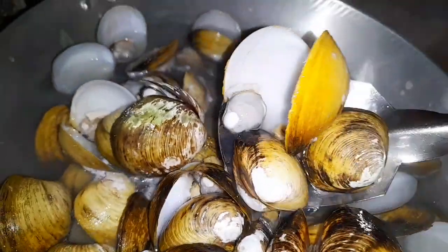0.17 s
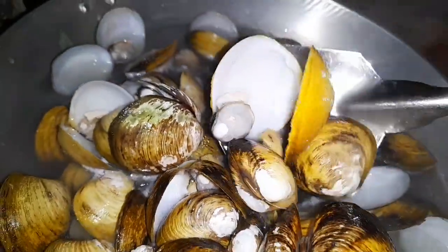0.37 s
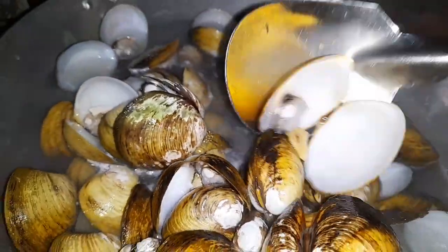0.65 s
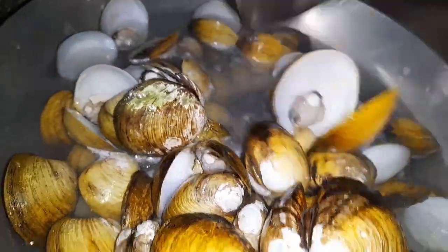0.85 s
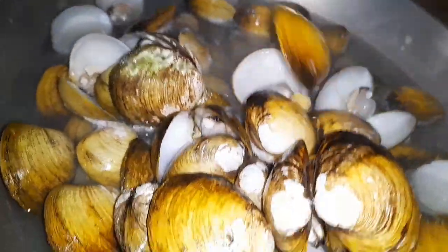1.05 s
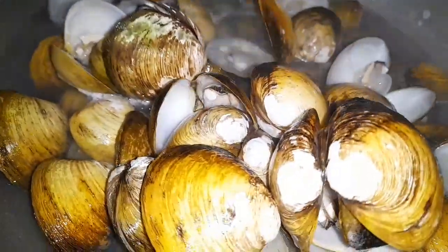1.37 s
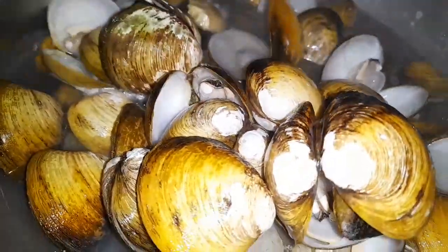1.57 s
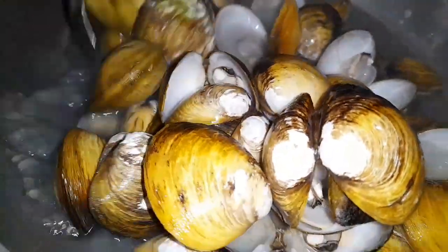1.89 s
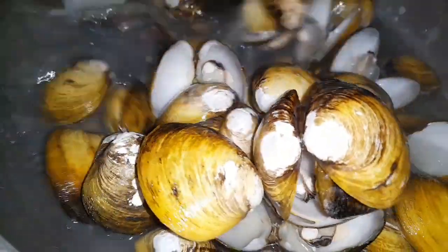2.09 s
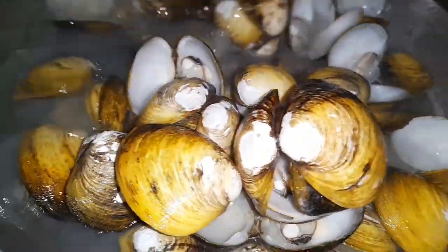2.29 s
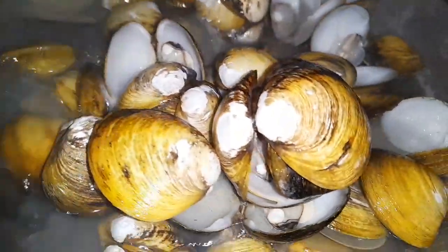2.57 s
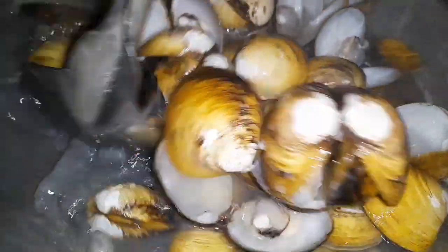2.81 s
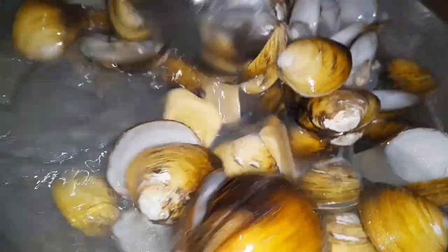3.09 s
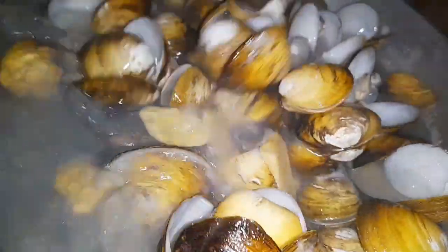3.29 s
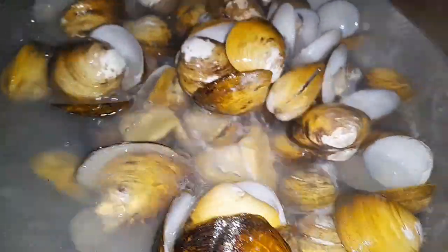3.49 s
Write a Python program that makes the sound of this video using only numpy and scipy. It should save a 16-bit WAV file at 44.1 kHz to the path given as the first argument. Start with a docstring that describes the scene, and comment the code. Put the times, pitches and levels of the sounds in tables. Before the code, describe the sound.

Clam shells click and clatter close to the microphone as a steel ladle stirs them in a pan of water. Scattered clicks grow into busy grinding and light sloshing, with one dull pan bump over a faint kitchen rumble.

```python
"""In a kitchen, clam shells are stirred with a steel ladle in a shallow pan of water.
A low rumble and a faint hiss fill the room. The shells grind over each other and the pan, water
slops between them, and each knock makes a click that rings briefly. Once the pan is bumped and
booms; later a few big bubbles gurgle. A phone with two microphones listens from close by."""
import sys
import numpy as np
from scipy import signal
from scipy.fft import rfft, irfft, next_fast_len
from scipy.io import wavfile
from scipy.ndimage import map_coordinates

SR = 44100
rng = np.random.default_rng(int(sys.argv[2]) if len(sys.argv) > 2 else 0)


def wav_out(sig):
    """Save sig, one row per channel (or a flat mono array), as 16-bit PCM at SR to the path in sys.argv[1]."""
    wavfile.write(sys.argv[1], SR, np.round(np.clip(np.atleast_2d(sig).T, -1, 1) * 32767).astype(np.int16))


N = 160965


def amp(db):
    return 10 ** (np.asarray(db) / 20)

def unit(x):
    return x / np.sqrt(np.mean(x ** 2) + 1e-20)

def along(points, hz):
    """Read between (frequency, value) points on a log frequency axis."""
    f, values = np.transpose(points)
    return np.interp(np.log(hz + 1), np.log(f + 1), values)

def curves(rows):
    """One value per sample for each column after the time."""
    times, *columns = np.transpose(rows)
    return [np.interp(np.arange(N) / SR, times, column) for column in columns]

def wobble(rate):
    """A smooth curve through `rate` random values a second."""
    return map_coordinates(rng.standard_normal(int(N * rate / SR) + 4), [np.arange(N) * rate / SR])

def filtered(x, response):
    """Scale and delay each frequency in x as response(hz) says."""
    size = next_fast_len(x.shape[-1] + 4096)
    return irfft(rfft(x, size) * response(np.fft.rfftfreq(size, 1 / SR)), size)[..., :x.shape[-1]]

def band(points):
    """A filter that follows (f/Hz, level/dB) points and falls away outside them."""
    ends = [(points[0][0] / 2, -120)] + list(points) + [(points[-1][0] * 2, -120)]
    return lambda hz: amp(along(ends, hz))

def stereo_noise(response, alike):
    """Filtered noise; `alike` (0 to 1) says how similar left and right are."""
    a, b = filtered(rng.standard_normal((2, N)), response)
    angle = np.arccos(alike) / 2
    middle, side = np.cos(angle) * a, np.sin(angle) * b
    return unit(np.array([middle + side, middle - side]))

def place(times, sounds):
    """Add up short sounds, shaped (events, 2, samples), at their start times."""
    at = np.round(times * SR).astype(int)[:, None] + np.arange(sounds.shape[-1])
    return np.array([np.bincount(at.ravel(), sounds[:, c].ravel(), N + SR)[:N] for c in range(2)])

def microphones(left_db):
    """Gain and delay at each microphone for sounds that are left_db louder on the left."""
    side = np.array([.5, -.5])
    lead_s = -.00004 + .000036 * left_db
    return amp(np.outer(left_db, side)), -np.outer(lead_s, side)


# How loud the room's rumble is: t/s, level/dB
RUMBLE_LEVELS = [(0, -45), (.9, -42), (1.1, -46), (1.5, -43), (2.45, -45), (2.8, -43), (3.65, -42)]
# The rumble's tone, from low to high: f/Hz, relative level/dB
RUMBLE_TONE = [(25, -36), (42, -16), (55, -7), (90, -11), (200, -7), (260, -12), (340, -17), (450, -26),
               (900, -34)]
# Humps added to that tone: f/Hz, width/Hz, relative level/dB
RUMBLE_HUMPS = [(61, 16, 11), (117, 24, 6)]
# The tone of the hiss: f/Hz, relative level/dB
HISS_TONE = [(500, -2), (900, -3), (1800, -9), (4500, -9), (8000, -13), (10200, -8), (14300, -13),
             (16500, -39)]

def rumble_and_hiss(hiss_db=-59):
    """The room's background: an uneven low rumble and a steady hiss."""
    def tone(f):
        humps = sum(amp(db) / (1 + ((f - hz) / (width / 2)) ** 2) for hz, width, db in RUMBLE_HUMPS)
        return band(RUMBLE_TONE)(f) * (1 + humps)

    level_db, = curves(RUMBLE_LEVELS)
    rumble = stereo_noise(tone, alike=.3) * amp([[.8], [-.8]])
    rumble *= amp(level_db + 1.5 * wobble(30))
    return rumble + amp(hiss_db) * stereo_noise(band(HISS_TONE), alike=.3)


STIR_LEFT_DB = 3  # the stirring is this much louder on the left

def pings(per_s, hz, pitch_spread, fade_s, spread_db, rise, size=900):
    """A random rain of tiny tones; each drops 60 dB in fade_s(f) and glides up by `rise`."""
    when, pitch, strength, where = rng.random((int(per_s * N / SR), 4)).T
    f = (hz * np.exp(pitch_spread * (2 * pitch - 1)))[:, None, None]
    gain, delay = microphones(STIR_LEFT_DB + 6 * (where - .5))
    t = np.clip(np.arange(size) / SR - .0002 - delay[..., None], 0, None)
    age = t / fade_s(f)
    wave = amp(-60 * age) * np.sin(2 * np.pi * f * t * (1 + rise * age))
    level = amp(-spread_db * np.log(strength + .01))[:, None, None]
    return unit(place(when * N / SR, wave * gain[..., None] * level))


# The tone of the grinding's body: f/Hz, relative level/dB
GRIND_TONE = [(1200, -12), (2900, 0), (4500, -2), (6500, -7), (8000, -20)]
# The tone of its high rasp: f/Hz, relative level/dB
RASP_TONE = [(5500, -18), (7500, -6), (10100, 0), (12000, -5), (15200, -14), (16500, -30)]
# The notes the steel ladle rings at, scraped here and struck in clicks(): f/Hz
LADLE_NOTES = [2860, 4360, 4900, 7220, 8030, 9300, 10350, 11220]

def grinding(body_db, treble_db, note_width_hz=90):
    """Shells tick and rub against each other, and the scraping makes the ladle ring."""
    def ladle(f):
        damping = 1j * f * note_width_hz
        return sum(damping / (hz * hz - f * f + damping) for hz in LADLE_NOTES)

    ticks = pings(per_s=700, hz=4500, pitch_spread=1.2, fade_s=lambda f: .003, spread_db=3.5, rise=0)
    rub = stereo_noise(np.ones_like, alike=.5) * amp(3.5 * wobble(80))
    rub *= amp([[STIR_LEFT_DB / 2], [-STIR_LEFT_DB / 2]])
    grit = amp(-2) * ticks + amp(-3) * rub
    body = amp(body_db) * unit(filtered(grit, band(GRIND_TONE)))
    rasp = amp(treble_db) * unit(filtered(grit, band(RASP_TONE)))
    scrape = amp(treble_db - 7) * unit(filtered(grit, ladle))
    return body + rasp + scrape


# The tone of the washing water: f/Hz, relative level/dB
WASH_TONE = [(150, -9), (290, 1.5), (480, -5), (800, -.8), (1300, -6), (2200, -14)]

def slopping():
    """Water washes between the shells, full of small bubbles that each ring for a moment."""
    bubbles = pings(per_s=220, hz=650, pitch_spread=.8, fade_s=lambda f: np.minimum(14 / f, .02),
                    spread_db=4, rise=.25)
    wash = stereo_noise(band(WASH_TONE), alike=.3) * amp(2.5 * wobble(30))
    return amp(-5) * bubbles + amp(.3) * wash


# How loud the stirring is: t/s, grinding body level/dB, grinding treble level/dB, water level/dB
STIR_LEVELS = [(.28, -72, -70, -66), (.38, -63, -58, -60), (.48, -64, -60, -60), (.54, -50, -62, -47),
               (.6, -64, -66, -60), (.85, -53, -60, -56), (1.08, -68, -64, -66), (1.28, -62, -62, -58),
               (1.3, -36, -34, -48), (1.39, -48, -45, -50), (1.45, -32, -25, -47), (1.51, -43, -41, -54),
               (1.57, -35, -35, -45), (1.7, -49, -55, -46), (2.0, -57, -64, -54), (2.1, -41, -42, -42),
               (2.22, -45, -54, -44), (2.29, -38, -37, -48), (2.42, -62, -64, -60), (2.53, -66, -68, -64),
               (2.6, -36, -37, -47), (2.72, -54, -60, -45), (2.8, -40, -47, -37), (2.88, -53, -58, -50),
               (3.0, -39, -46, -39), (3.13, -33, -37, -37), (3.22, -48, -54, -48), (3.3, -39, -46, -40),
               (3.4, -38, -45, -41), (3.49, -56, -58, -56), (3.65, -63, -62, -60)]

def stirring():
    """Grinding and slopping swell and fade as the ladle moves."""
    body_db, treble_db, water_db = curves(STIR_LEVELS)
    return grinding(body_db, treble_db) + amp(water_db) * slopping()


def click_tone(bass_db, treble_db):
    """The filter that makes one click dull or bright."""
    low, high = bass_db + 6, treble_db + 1.5
    points = [(250, low - 24), (800, low - 3), (1600, low), (3000, -.3), (5500, -1.5),
              (7800, high - 5), (10000, high), (16000, high - 11)]
    return lambda hz: amp(along(points, hz))

def crack(t, tone, ring_hz, delay, length):
    """A knock's burst of noise and its rattling tail; a shorter burst also hits harder."""
    def response(f):
        hump_db = 6 * np.exp(-.5 * (np.log((f + 1) / ring_hz) / .09) ** 2)
        return tone(f) * amp(hump_db) * np.exp(-2j * np.pi * f * delay[:, None])

    shared, *each_side = rng.standard_normal((3, t.shape[-1]))
    noise = filtered(shared + .8 * np.array(each_side), response)
    burst = amp(-60 * t / (.009 * length)) / length ** 2
    tail = amp(-13 - 60 * t / .08)
    return noise * (burst + tail)


# The notes of a large empty shell that lands first: f/Hz
BIG_SHELL_NOTES = [2536, 3305, 4000, 4398, 6272, 9701]
# One knock a row, with levels relative: t/s, body level/dB, main ring f/Hz,
# bass over body level/dB, treble over body level/dB, left over right level/dB
KNOCKS = [(0.497, -46, 780, 8, -8, -1), (0.5204, -43, 3080, -2, -10, 1), (0.599, -44, 2000, -2, -14, 1),
          (0.6392, -26, 7950, -21, -3, 0), (0.6626, -35, 820, -1, -7, -2), (0.6761, -20, 5210, -16, -9, -1),
          (0.7362, -34, 2990, -14, -10, -4), (0.7497, -23, 2970, -22, -5, -4),
          (0.7646, -15, 1590, 0, -17, -1), (0.833, -14, 2970, -15, -10, 0), (0.8568, -34, 1530, 1, -11, 0),
          (0.928, -46, 1610, 8, -10, 2), (0.959, -48, 1100, 6, -10, 2), (1.0124, -40, 2520, -4, -12, 4),
          (1.1168, -12, 9730, -16, -3, 1), (1.154, -36, 2410, -5, -2, 0), (1.1989, -32, 5300, -11, 5, 1),
          (1.2917, -24, 11160, -14, 1, 3), (1.3233, -23, 4910, 2, 3, 5), (1.3898, -34, 3530, -8, 0, 5),
          (1.4039, -19, 9300, -19, 4, 5), (1.4095, -19, 10290, -19, 3, 5), (1.4455, -24, 10490, -17, 8, 6),
          (1.4575, -20, 9860, -14, 5, 6), (1.4677, -20, 10380, -14, 5, 5), (1.4795, -23, 10100, -14, 6, 5),
          (1.5342, -29, 2970, -12, -5, 6), (1.5679, -23, 9630, -16, 5, 8), (1.5761, -22, 3140, -14, 1, 5),
          (1.5898, -27, 10310, -14, 6, 7), (1.6098, -18, 9860, -11, 3, 7), (1.6267, -26, 4950, -5, -5, 5),
          (1.6693, -29, 4480, -6, -5, 7), (1.6878, -34, 1590, -1, -12, 6), (1.7612, -35, 3640, -7, -14, 8),
          (1.8205, -22, 12470, -16, 3, 7), (1.9321, -21, 3490, -15, -14, 8), (2.0216, -39, 860, -1, -9, 1),
          (2.0617, -23, 6480, -7, -9, 2), (2.0787, -21, 9600, -6, 5, 2), (2.1275, -23, 5400, -10, -6, 4),
          (2.1384, -32, 900, 1, -6, 4), (2.1857, -34, 1210, 2, -14, 3), (2.2048, -28, 1210, -3, -13, 2),
          (2.2418, -16, 4300, -23, -2, 1), (2.2699, -16, 5230, -18, 1, 1), (2.2764, -17, 5300, -18, 2, 3),
          (2.281, -19, 4780, -17, 1, 1), (2.2926, -24, 5190, -15, -3, 4), (2.3326, -24, 4000, -2, -8, 5),
          (2.3606, -20, 5340, -20, -4, 6), (2.431, -44, 1500, 0, -8, 4), (2.469, -42, 3800, -6, -8, 4),
          (2.5405, -21, 11260, -18, 6, 5), (2.5888, -22, 10010, -13, 4, 7), (2.6049, -26, 11780, -16, 2, 6),
          (2.6414, -20, 5250, -15, -6, 7), (2.6651, -29, 5400, -7, -8, 7), (2.7415, -31, 3250, -7, -19, 3),
          (2.7779, -23, 3230, -5, -8, 6), (2.7828, -24, 2130, -7, -9, 7), (2.9405, -31, 2890, -6, -6, 1),
          (2.9622, -22, 2370, -10, -12, 5), (2.9831, -24, 3320, -12, -7, 4), (3.0112, -22, 5000, -4, -9, 4),
          (3.0356, -27, 3600, -7, -14, 8), (3.0567, -23, 3750, -12, -5, 2), (3.0686, -27, 4690, -9, -3, 2),
          (3.0924, -26, 5400, -9, -7, 3), (3.1074, -24, 2370, -5, -9, 2), (3.1142, -18, 3810, -10, -16, 8),
          (3.1369, -19, 5490, -5, -3, 5), (3.1418, -21, 3920, -8, -1, 3), (3.2259, -28, 2020, -9, -7, 1),
          (3.2843, -18, 2090, -10, -12, 2), (3.2968, -25, 10870, -12, -1, 3),
          (3.314, -29, 3600, -2, -12, 3), (3.3292, -25, 4970, -5, -14, 5), (3.3373, -27, 3080, -14, -5, 2),
          (3.3446, -17, 5150, -11, -5, 4), (3.3676, -12, 3400, -17, -12, 2), (3.409, -28, 3960, -14, -6, 6),
          (3.414, -15, 3490, -13, -5, 3), (3.4499, -26, 3640, -12, -14, 1), (3.5382, -21, 2900, -8, -2, 6),
          (3.5606, -33, 3270, -10, -13, 3), (3.585, -37, 3210, -7, -15, 5)]

def clicks(notes=13, size=4400, bright_hz=9000, big_shell_until_s=1.15):
    """Each knock cracks and sets shells ringing; bright ones also ring the big shell or the ladle."""
    main = (np.arange(notes) == 0)[:, None, None]  # marks the main note; the rest are random
    times, sounds = [], []
    for start, db, ring_hz, bass_db, treble_db, left_db in KNOCKS:
        (gain,), (delay,) = microphones(np.array([left_db]))
        t = np.clip(np.arange(size) / SR - .0003 - delay[:, None], 0, None)
        bright = ring_hz > bright_hz
        length = 1 if bright else .7  # duller clicks are shorter
        tone = click_tone(bass_db, treble_db)
        pitch, strength, scatter, left, right = rng.standard_normal((notes, 5, 1, 1)).swapaxes(0, 1)
        hz = np.where(main, ring_hz, np.clip(5000 * np.exp(.7 * pitch), 400, 15000))
        level = tone(hz) * amp(np.where(main, -7, -14) + 2.5 * strength)
        fade_s = np.where(main, 1, length) * .026 * np.exp(.25 * scatter)
        phase = .9 * np.hstack([left, right])
        ring = np.sum(level * amp(-60 * t / fade_s) * np.sin(2 * np.pi * hz * t + phase), axis=0)
        if bright:
            struck_notes = BIG_SHELL_NOTES if start < big_shell_until_s else LADLE_NOTES
            detunes = 1 + .015 * scatter  # the ladle's pitch shifts with how deep it dips
            for f, note_db, detune in zip(struck_notes, -14.5 + 3 * strength, detunes):
                ring += amp(note_db - 60 * t / .065) * np.sin(2 * np.pi * f * detune * t)
        attack = 1 - np.exp(-t / .00025)
        click = attack * (crack(t, tone, ring_hz, delay, length) + ring)
        sounds.append(amp(db + 4.8) * gain[:, None] * click)
        times.append(start - .0004)
    return place(np.array(times), np.array(sounds))


# The pan's low notes: f/Hz, relative level/dB, time to fade by 60 dB t/s
PAN_NOTES = [(59, -7, .11), (150, -7, .035), (292, -15, .22), (215, -14, .08), (322, -15, .14)]

def pan_bump(start_s=1.3232, push_s=.0012):
    """One dull push on the pan, which booms briefly."""
    t = np.clip(np.arange(N) / SR - start_s, 0, None)
    boom = sum(amp(db - 60 * t / fade_s) * np.sin(2 * np.pi * hz * t) for hz, db, fade_s in PAN_NOTES)
    push = t / push_s * (2 - t / push_s) * np.exp(-t / push_s)
    return amp(-14) * (boom + .7 * push) * amp([[2.5], [-2.5]])


# Big bubbles in the water: t/s, level/dB, starting f/Hz
BIG_BUBBLES = [(2.73, -27, 850), (2.79, -24, 880), (3.0, -25, 750), (3.013, -23, 700)]

def gurgles(size=2600, fade_s=.05):
    """A few big bubbles ring: soft start, rising pitch, quick fade."""
    times, db, hz = np.transpose(BIG_BUBBLES)[..., None, None]
    t = np.arange(size) / SR
    envelope = amp(db - 60 * t / fade_s) * (1 - np.exp(-t / .002))
    wave = envelope * np.sin(2 * np.pi * hz * t * (1 + 6 * t))
    return place(times.ravel(), wave * amp([[1.5], [-1.5]]))


def kitchen_echo(x, fade_s=.25):
    """Sound bounces off pan and walls in a short blur, different at each microphone."""
    t = np.arange(SR // 2) / SR
    tail = rng.standard_normal((2, len(t))) * amp(-60 * t / fade_s) * (t > .003)
    return signal.fftconvolve(x, unit(tail) / np.sqrt(len(t)), axes=-1)[:, :N]

def scene():
    """The sudden sounds and their echo, over the stirring and the room's background."""
    sudden = clicks() + pan_bump() + gurgles()
    return sudden + amp(-16) * kitchen_echo(sudden) + stirring() + rumble_and_hiss()

def record(dry, low_hz=45, top_hz=16600):
    """The phone thins the deepest bass and keeps nothing above top_hz."""
    return filtered(dry, lambda hz: (hz < top_hz) * (1j * hz / (low_hz + 1j * hz)) ** 2)


dry = scene()
out = record(dry)
wav_out(out)
```